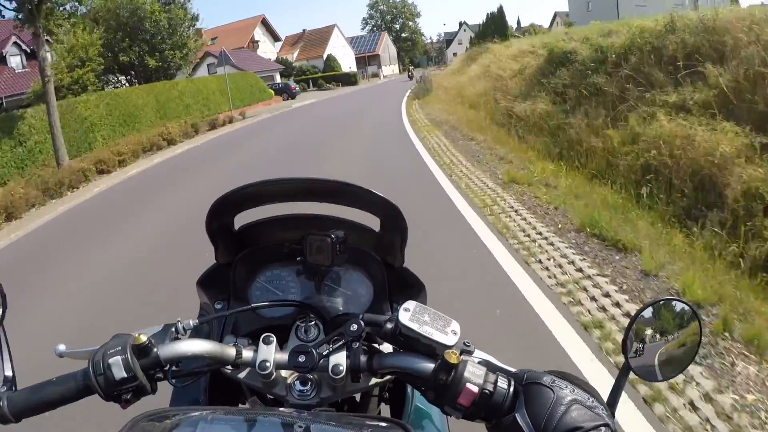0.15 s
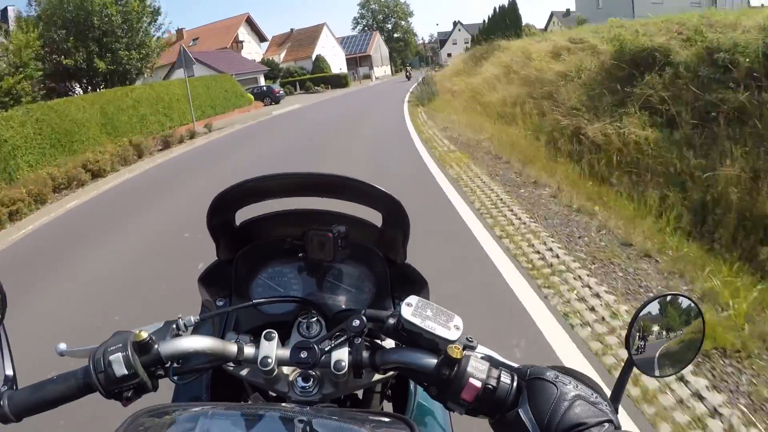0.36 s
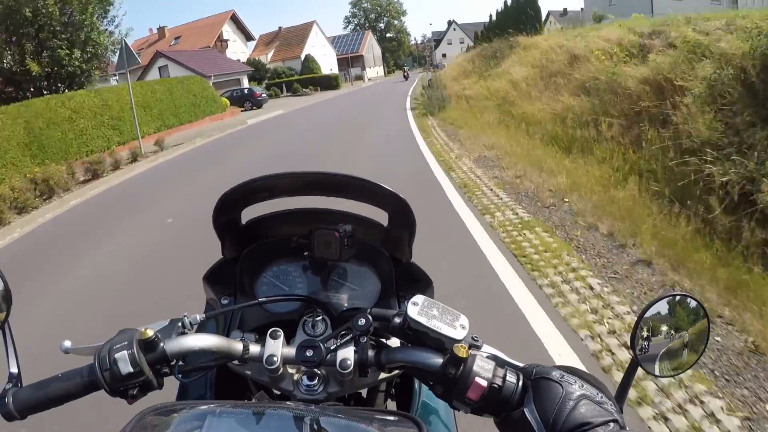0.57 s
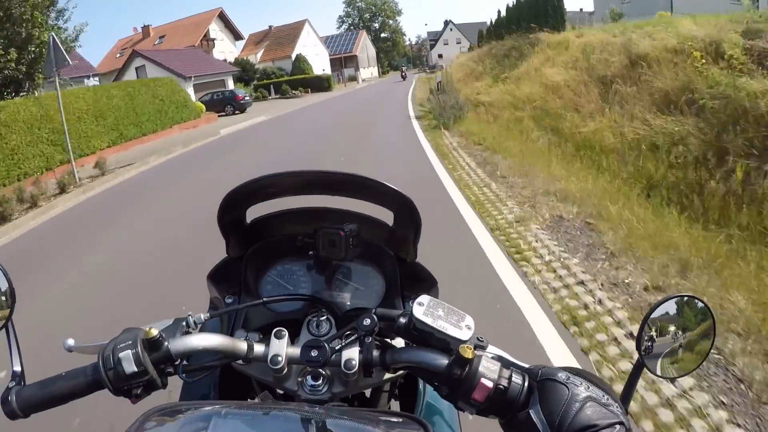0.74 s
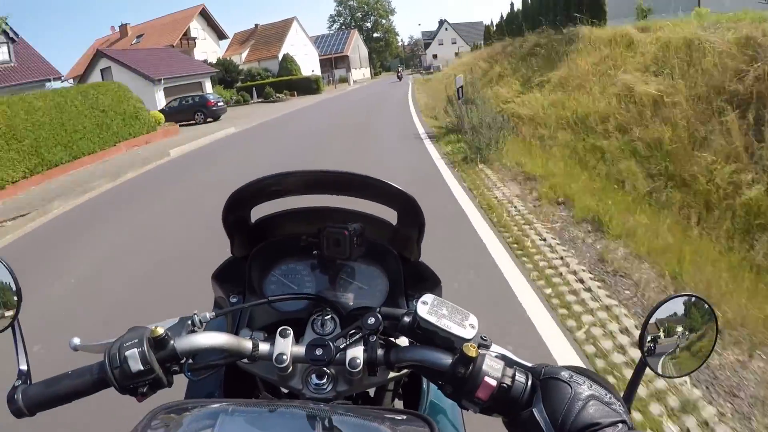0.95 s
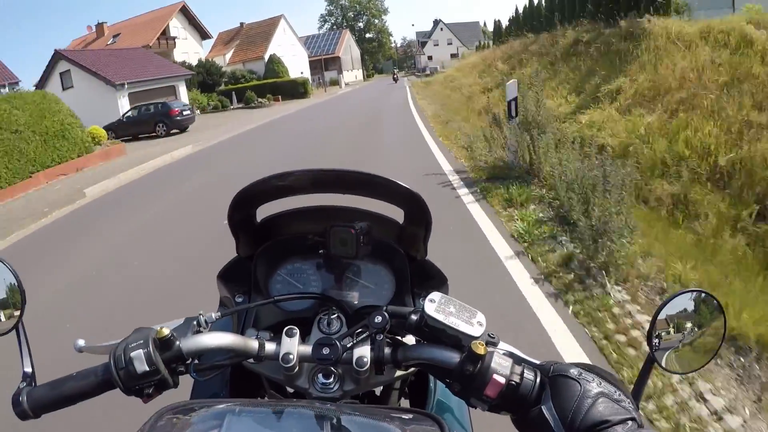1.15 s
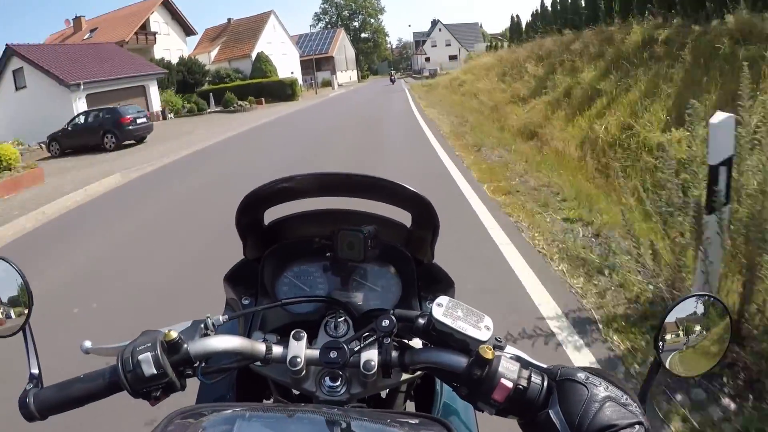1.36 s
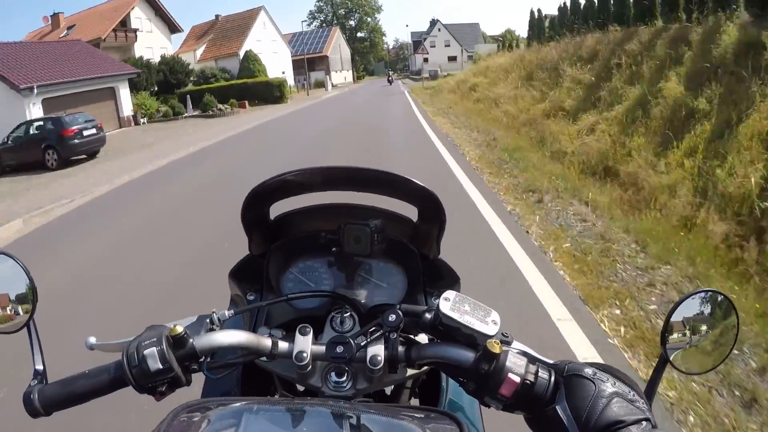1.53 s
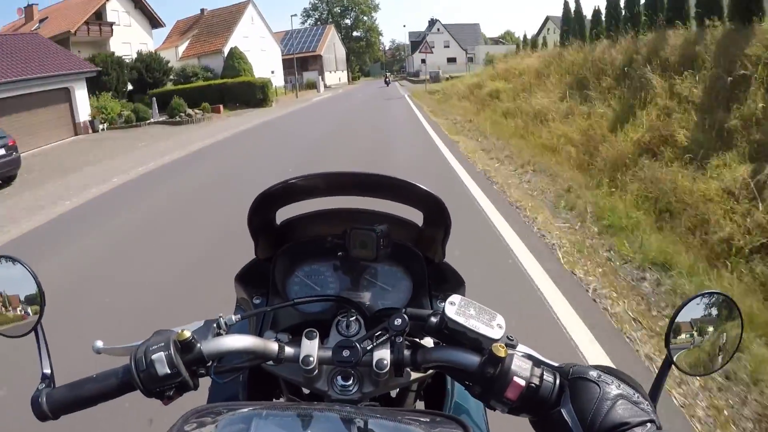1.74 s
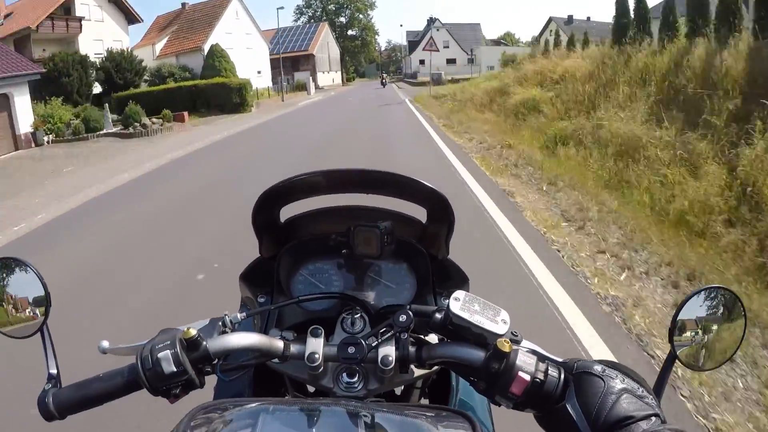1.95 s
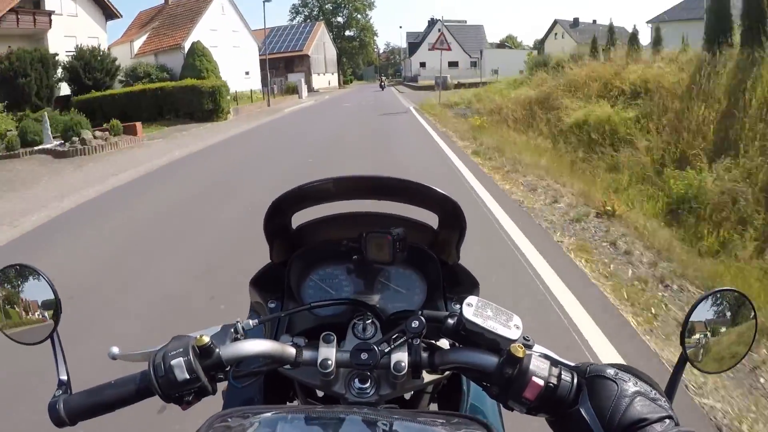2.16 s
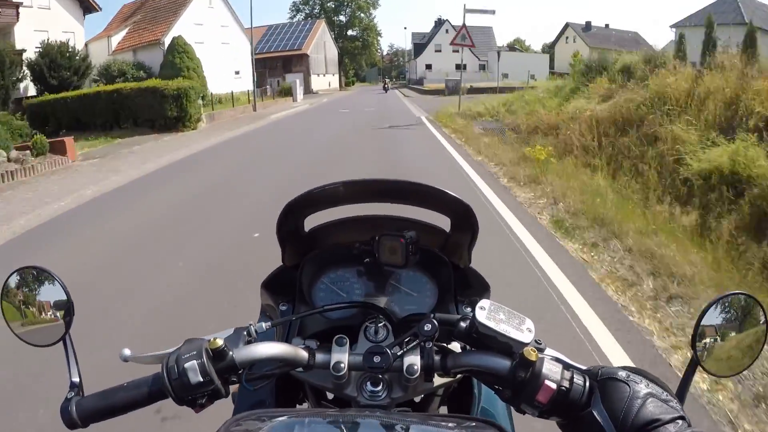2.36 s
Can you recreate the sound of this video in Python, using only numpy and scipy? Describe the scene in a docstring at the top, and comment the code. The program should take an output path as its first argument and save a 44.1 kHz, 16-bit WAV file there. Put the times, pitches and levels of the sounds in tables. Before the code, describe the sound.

A motorcycle engine drones deep and smooth from 0 to 2.5 seconds, its pitch creeping up slightly. Irregular wind buffeting rumbles at the onboard microphone, with soft low thumps around 0.4, 0.9, 1.3 and 1.7 seconds. Throbbing road roar and quiet hissing air with very faint thin whistles run beneath. From about 1.8 seconds the engine becomes brighter and hollower as the throttle opens. Open air, no echo.

```python
"""Motorcycle ride heard by the rider

The exhaust drones on whole and fractional orders of a rising firing rate. Impulses, strong and weak in turn,
ring the casing; noise puffs on the strong ones drive casing and intake. Wind is flickering low-frequency noise
with pressure pulses; road and air rush are coloured noise bands; thin whistles are noise in narrow resonances."""
import sys
import numpy as np
from scipy import signal
from scipy.fft import rfft, irfft
from scipy.io import wavfile
from scipy.ndimage import uniform_filter1d

SR = 44100
rng = np.random.default_rng(int(sys.argv[2]) if len(sys.argv) > 2 else 0)


def gain_from_db(level_db):
    """Convert decibel levels to linear amplitude factors (20 dB per decade)."""
    decades = np.asarray(level_db, float) / 20
    return 10 ** decades


def bounce(signal):
    """Save signal as a 16-bit WAV file at the path given by the first command-line argument."""
    frames = np.transpose(np.atleast_2d(signal))
    limited = np.clip(frames, -1, 1)
    pcm = np.round(limited * 32767).astype(np.int16)
    wavfile.write(sys.argv[1], SR, pcm)


N = 110250  # samples: 2.5 s


def curve(rows, col):
    """Linear interpolation: a table column as a value per sample."""
    rows = np.array(rows, float)
    return np.interp(np.arange(N) / SR, rows[:, 0], rows[:, col])


def unit(x):
    """Normalization: scale to rms 1."""
    return x / np.sqrt(np.mean(x ** 2))


def walk(rate):
    """Band-limited fluctuation: random levels held 1 / rate s, smoothed twice, slow drift removed; rms 1."""
    hold = int(SR / rate)
    steps = np.repeat(rng.standard_normal(N // hold + 1), hold)
    smooth = uniform_filter1d(uniform_filter1d(steps, hold), hold)[:N]
    return unit(smooth - uniform_filter1d(smooth, 4 * hold))


def ring(x, hz, width):
    """Simple resonance: a two-pole filter of the given half-power width."""
    return signal.lfilter(*signal.iirpeak(hz, hz / width, fs=SR), x)


def bands(colour, flicker_db, rate):
    """Filtered noise: half-octave-spaced bands that flicker partly together; returns centres [Hz] and bands."""
    rows = np.array(colour, float)
    octave = np.log2(np.fft.rfftfreq(N, 1 / SR) + .1)
    shape_db = np.interp(octave, np.log2(rows[:, 0]), rows[:, 1], left=-60, right=-90)
    spectrum = rfft(rng.standard_normal(N)) * gain_from_db(shape_db)
    low, high = np.log2(rows[[0, -1], 0])
    centres = np.arange(1, 14.6, .5)  # log2 of Hz
    centres = centres[(centres > low - .5) & (centres < high + .5)]
    shared = walk(rate)
    out = []
    for centre in centres:
        band = irfft(spectrum * np.clip(1 - 2 * abs(octave - centre), 0, 1), N)
        out.append(band * gain_from_db(flicker_db * (0.67 * shared + 0.87 * walk(rate))))
    return 2 ** centres, np.array(out)


# Road and air rush: (time [s], roar level before throb and trim [dB], hiss level [dB])
RUSH = [(0, -33.5, -46.5), (.4, -31.5, -46), (.8, -31.5, -45.5), (1.2, -31.5, -45.5), (1.45, -31, -45.5),
        (1.62, -32.5, -45.5), (1.76, -30.5, -44.5), (2.0, -30.5, -44.3), (2.25, -29.5, -44.3),
        (2.5, -30, -45.5)]
# Roar spectrum: (frequency [Hz], relative density [dB])
ROAR_COLOUR = [(300, 0.5), (560, -4), (700, -2.5), (930, -3), (1020, -7.5), (1110, -4), (1260, -6),
               (1440, -3), (1760, -12), (2200, -15.5), (2800, -23)]


def roar():
    """Amplitude modulation: road and engine roar as coloured noise swelling once every second firing."""
    noise = unit(bands(ROAR_COLOUR, flicker_db=1.0, rate=16)[1].sum(0))
    throb_db = 1.6 * np.cos(np.pi * firing_phase() - 1)
    return noise * gain_from_db(curve(RUSH, 1) - 2.0 + throb_db)  # 2 dB trim


# Hiss spectrum: (frequency [Hz], relative density [dB])
HISS_COLOUR = [(1800, 2), (2600, -2), (3100, 1.5), (3800, -0.5), (4900, -6), (6000, -4), (7000, -6),
               (8500, -14.5), (10000, -21), (12000, -21.5), (15000, -37)]


def hiss():
    """Broadband flow noise: air over the fairing as gently flickering coloured noise."""
    return gain_from_db(curve(RUSH, 2)) * unit(bands(HISS_COLOUR, flicker_db=.7, rate=20.34)[1].sum(0))


# Thin tones: (frequency [Hz], width of each resonance pass [Hz], level before flicker [dB])
WHISTLES = [(3044, 79, -61.5), (3760, 51, -65.5), (3993, 50, -64.5), (5670, 79, -68), (5950, 97, -62.5)]


def whistles():
    """Narrow-band noise: two resonances in series turn white noise into thin wavering tones."""
    out = np.zeros(N)
    for hz, width, db in WHISTLES:
        tone = ring(ring(rng.standard_normal(N), hz, width), hz, width)
        out += gain_from_db(db + 2 * walk(8.82)) * unit(tone)
    return out


# Deep buffet: (time [s], level [dB])
BUFFET = [(0, -17), (.25, -17.5), (.55, -17), (.72, -16.5), (.85, -18), (1.05, -16), (1.4, -19),
          (1.63, -17), (1.85, -17.5), (2.05, -18.5), (2.15, -17), (2.25, -19.5), (2.36, -18), (2.5, -14)]
# Spectrum of buffet and flapping: (frequency [Hz], relative density [dB])
BUFFET_COLOUR = [(5, -10.5), (14, -8.5), (30, -17), (60, -17), (120, -13), (190, -18), (300, -23),
                 (500, -31), (800, -48.5)]
# Upper part of the gusts: (time [s], level before flutter [dB])
FLAP = [(0, -26), (.3, -26), (.45, -24.5), (.57, -23.5), (.68, -23), (.76, -24.5), (1.0, -24.5),
        (1.15, -22.5), (1.26, -25), (1.45, -26), (1.64, -26.5), (1.75, -19.5), (1.84, -25.5), (1.96, -23),
        (2.07, -23), (2.25, -24), (2.36, -26), (2.5, -23.5)]


def gusts():
    """Turbulent pressure fluctuation: low noise split at 90 Hz into a deep buffet and a throbbing flap."""
    hz, noise = bands(BUFFET_COLOUR, flicker_db=1, rate=12)
    deep = unit(noise[hz < 90].sum(0))
    upper = unit(noise[hz >= 90].sum(0))
    flutter_db = 1.8 * walk(28)
    return gain_from_db(curve(BUFFET, 1)) * deep + gain_from_db(curve(FLAP, 1) + flutter_db) * upper


# Single slaps of wind: (time of the peak [s], peak level [dB], length of the positive lobe [s])
SLAPS = [(0.023, -9, 0.008), (0.435, -7.5, 0.012), (0.522, -10.5, 0.012), (0.921, -11, 0.01),
         (1.312, -10, 0.015), (1.731, -13.5, 0.0094), (1.867, -12, 0.013), (1.976, -13, 0.012),
         (2.057, -13, 0.012), (2.24, -12, 0.026)]


def slaps():
    """Pressure pulse: each slap on the microphone is a positive lobe between two negative ones."""
    t = np.arange(N) / SR
    out = np.zeros(N)
    for peak_time, db, length in SLAPS:
        u = 2 * (t - peak_time) / length
        out += gain_from_db(db) * (1 - u ** 2) * np.exp(-u ** 2 / 2)
    return out


# Engine: (time [s], firing rate [Hz], drone level [dB])
ENGINE = [(0.0, 87.9, -16.3), (0.25, 88.6, -16.2), (0.5, 89.1, -17.4), (0.75, 90.0, -16.3),
          (1.0, 91.0, -15.6), (1.25, 91.1, -15.6), (1.5, 92.3, -15.4), (1.75, 92.9, -16.1),
          (2.0, 93.9, -17.3), (2.25, 95.2, -16.6), (2.5, 95.1, -16.9)]


def firing_phase():
    """Phase accumulation: the integral of the firing rate counts firings."""
    return np.cumsum(curve(ENGINE, 1)) / SR


# Casing modes: (frequency [Hz], width [Hz], relative level [dB])
CASING = [(569, 48, -1), (798, 90, -4.5), (916, 57, -1.5), (1107, 54, 0), (1400, 140, -6.5)]


def casing(force):
    """Modal synthesis: low-passed force excites parallel resonances of alternating sign; rms 1."""
    soft = signal.butter(N=4, Wn=2500, fs=SR, output="sos")
    force = signal.sosfilt(soft, force)
    out = np.zeros(N)
    for k, (hz, width, db) in enumerate(CASING):
        out += (-1) ** k * gain_from_db(db) * unit(ring(force, hz, width))
    return unit(out)


def knocks():
    """Impulsive excitation: one jittered impulse per firing, strong and weak in turn."""
    at = np.flatnonzero(np.diff(np.floor(firing_phase())))
    chance = rng.standard_normal((len(at), 2))
    jitter = chance[:, 0] * .02 * SR / ENGINE[0][1]  # share of the first firing period
    when = np.clip(at + jitter, 0, N - 1).astype(int)
    weak_db = -10 * (np.arange(len(at)) % 2)
    out = np.zeros(N)
    out[when] = gain_from_db(3 * chance[:, 1] + weak_db)
    return out


def puffs():
    """Gated noise: a burst every second firing, with the strong knock, decays over 0.29 of that cycle."""
    cycle = (firing_phase() - 1) / 2 % 1
    return np.exp(-cycle / 0.29) * rng.standard_normal(N)


# Intake roar: (time [s], level [dB]); it grows as the throttle opens
INTAKE = [(0, -52.5), (1.6, -45.5), (1.9, -38), (2.25, -35.5), (2.5, -41)]


def intake(puff):
    """Cavity resonance: puffs through two equal resonances in series give a hollow roar."""
    return gain_from_db(curve(INTAKE, 1)) * unit(ring(ring(puff, 760, 225), 760, 225))


# Multiples of the firing rate [1]; halves belong to the two-firing engine cycle,
# the other fractions may be gear whine
ORDERS = [1, 6, 6.25, 7, 7.5, 8, 8.5, 9, 9.5, 10, 10.5, 11.5, 11.8, 12, 12.5, 14.6, 15.75, 16]
# One row per order, relative to the drone: (start [dB], middle [dB], end [dB])
ORDER_DB = [(0, 0, 0), (-37.5, -36, -30), (-37, -28, -34), (-45, -43, -29), (-46.5, -44, -29.5),
            (-44, -39, -26.5), (-40, -35.5, -22.5), (-42, -42, -27.5), (-37, -38.5, -28.5), (-31, -28, -29),
            (-37.5, -28, -25.5), (-33.5, -33.5, -35), (-42, -31.5, -25), (-38, -30, -35.5),
            (-35, -39.5, -33), (-32.5, -31, -43.5), (-32.5, -34, -37.5), (-34.5, -40, -39)]
# Octave of the firing note: (time [s], level relative to the drone [dB])
OCTAVE = [(0, -26.5), (.8, -23.5), (1.3, -18), (1.75, -19.5), (1.95, -11.5), (2.2, -14.5), (2.35, -22),
          (2.5, -16)]


def drone():
    """Additive synthesis: flickering sines on the orders; the firing note and its octave also drift together."""
    flicker_db, upper_flicker_db = 1.2, 1.3
    turn = 2 * np.pi * firing_phase() + .03 * walk(9.9)  # waver [rad]
    wander = .15 * walk(13)  # [rad], doubled in the octave
    out = np.zeros(N)
    for order, levels in zip(ORDERS, ORDER_DB):
        level_db = np.interp(np.linspace(0, 2, N), range(3), levels)
        level_db += (upper_flicker_db if order > 1 else flicker_db) * walk(23.96)
        offset = 1.2 * rng.standard_normal()  # [rad]
        angle = order * (turn - 2 * np.pi) + (order == 1) * wander + offset
        out += gain_from_db(level_db) * np.sin(angle)
    octave_db = curve(OCTAVE, 1) + upper_flicker_db * walk(20)
    out += gain_from_db(octave_db) * np.sin(2 * turn + 2 * wander)
    return np.sqrt(2) * gain_from_db(curve(ENGINE, 2)) * out


def engine():
    """Superposition: drone, intake roar and casing sound, the casing following the road-rush level."""
    puff = puffs()
    load = gain_from_db(curve(RUSH, 1) - RUSH[0][1])  # 1 at the start
    ringing = gain_from_db(-49) * casing(knocks()) + gain_from_db(-42.5) * casing(puff)
    return drone() + intake(puff) + load * ringing


def scene():
    """Superposition: rush, wind and engine add at one microphone."""
    return (roar() + hiss() + whistles() + gusts() + slaps() + engine())[None]


def band_limit(x):
    """A steep low-pass at the top of the band."""
    return signal.sosfilt(signal.butter(12, 15130, fs=SR, output="sos"), x)


def record(dry):
    """Linear gain ramp: the sound fades in over the first 4 ms."""
    mix = dry * np.clip(np.arange(N) / SR / .004, 0, 1)
    return band_limit(mix)


dry = scene()
out = record(dry)
bounce(out)
```